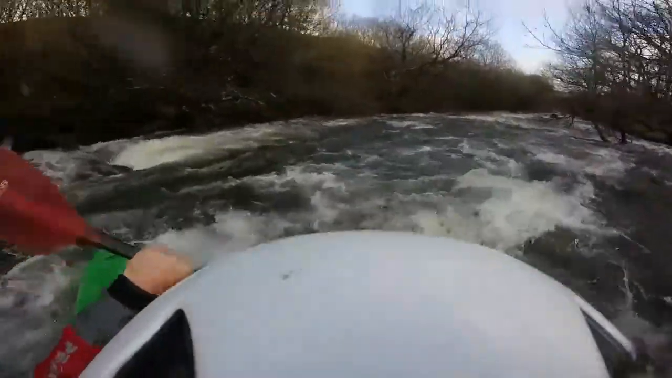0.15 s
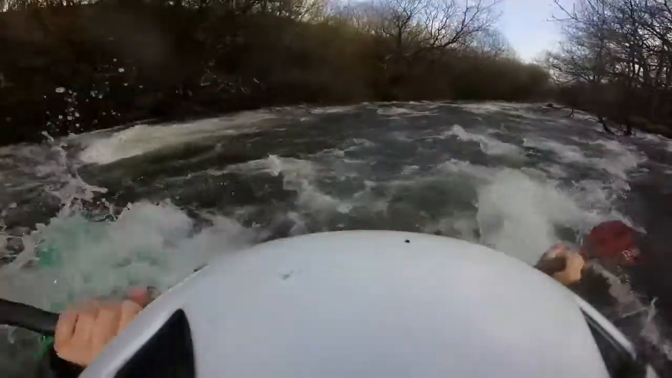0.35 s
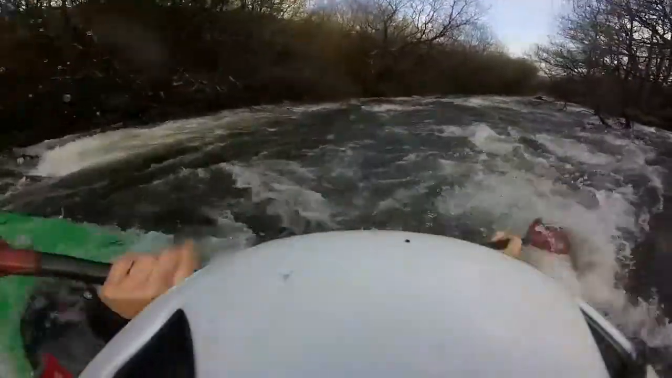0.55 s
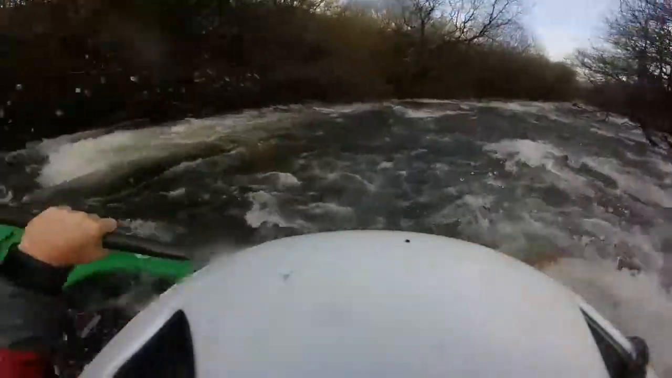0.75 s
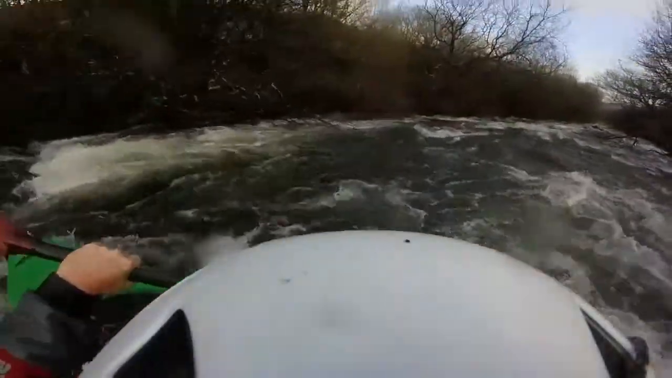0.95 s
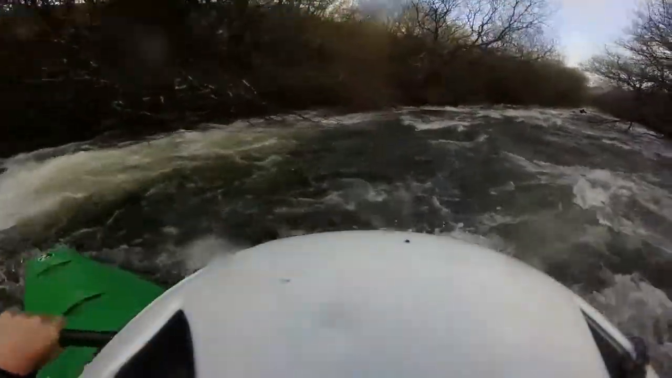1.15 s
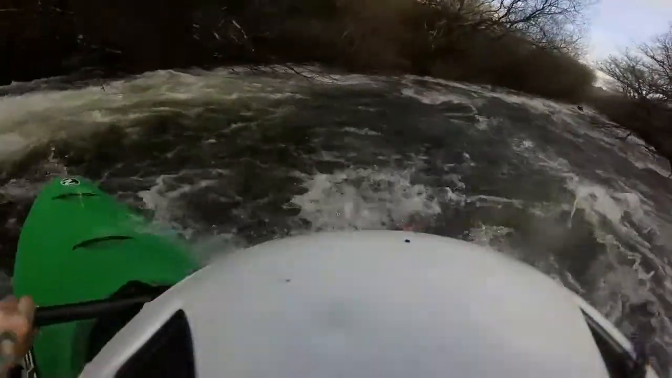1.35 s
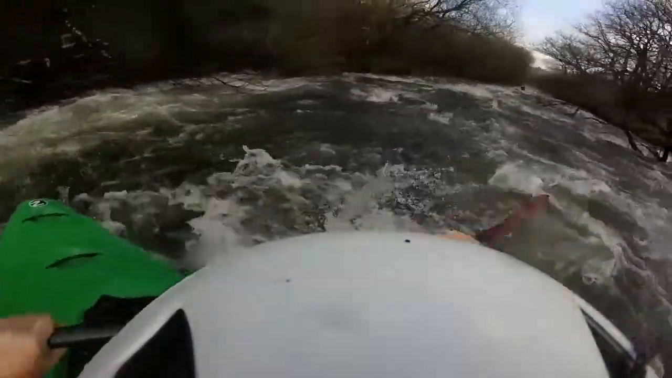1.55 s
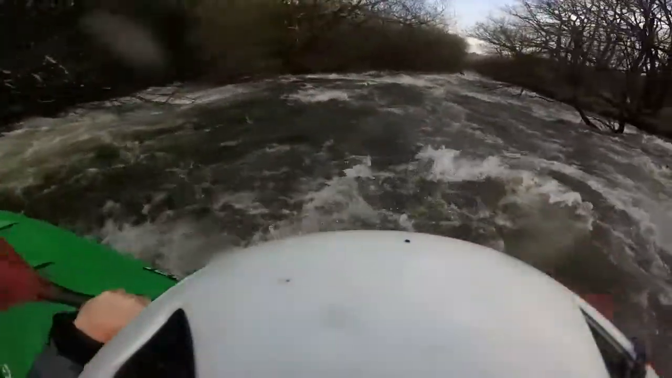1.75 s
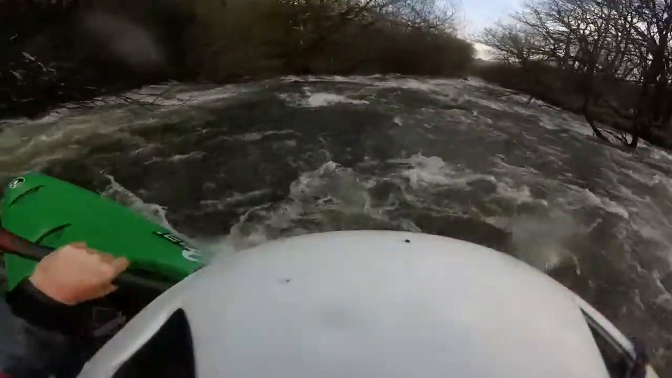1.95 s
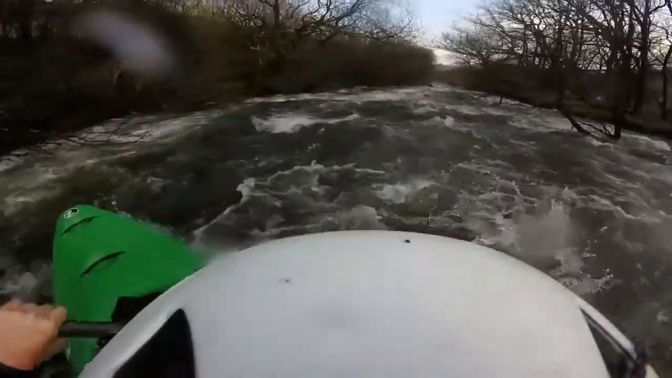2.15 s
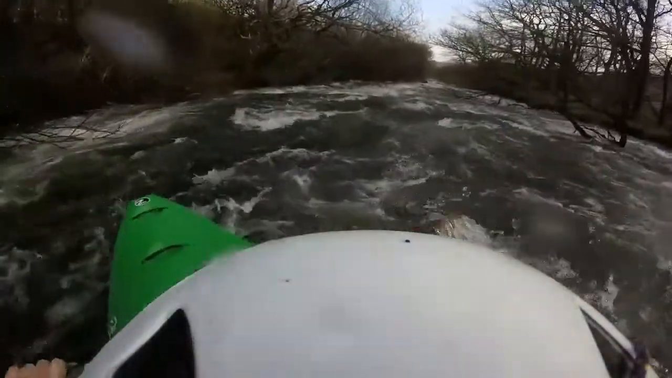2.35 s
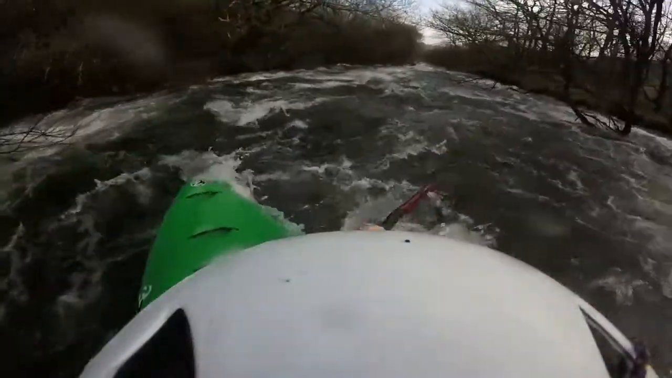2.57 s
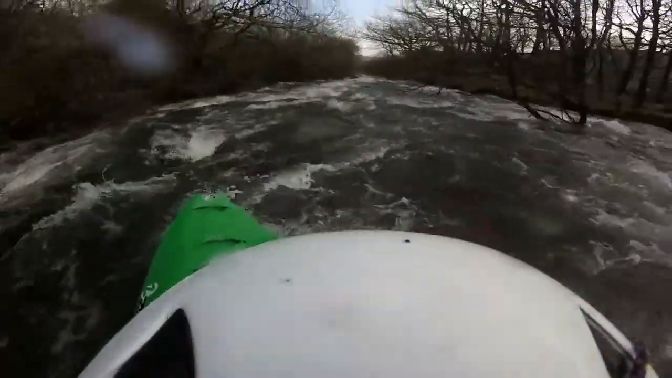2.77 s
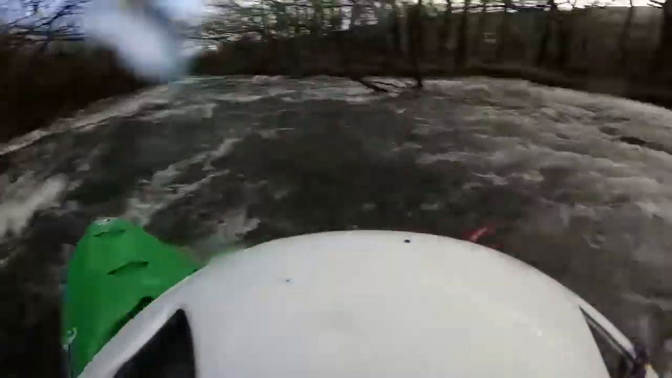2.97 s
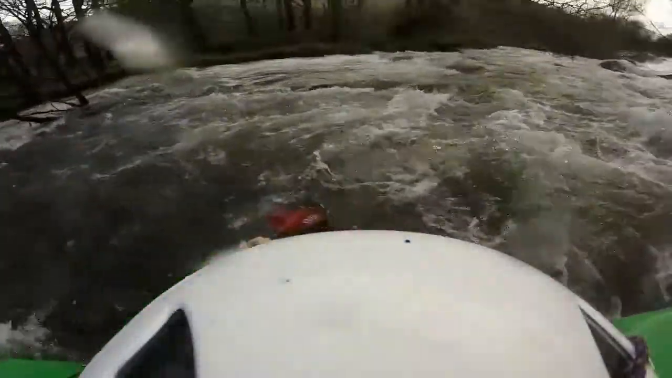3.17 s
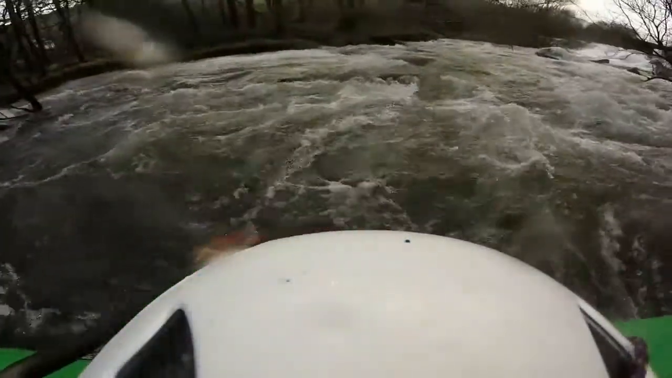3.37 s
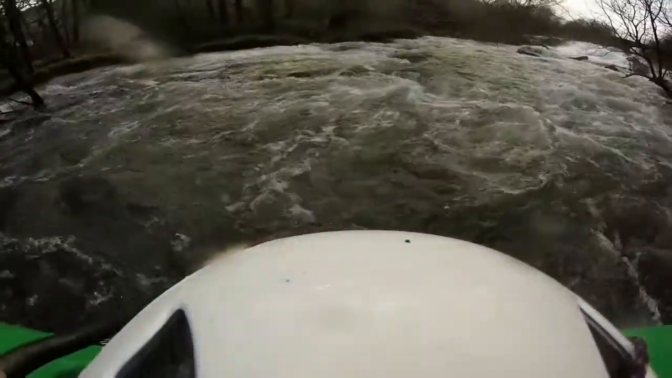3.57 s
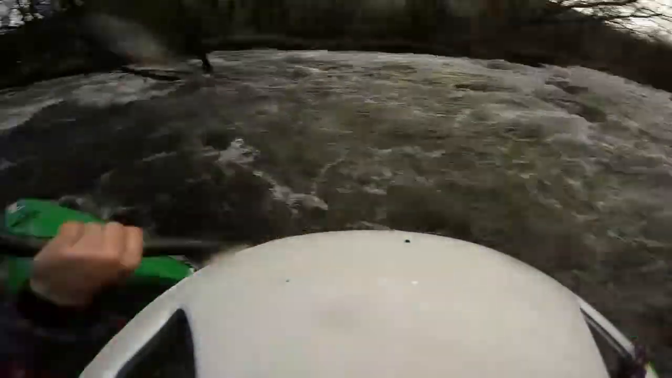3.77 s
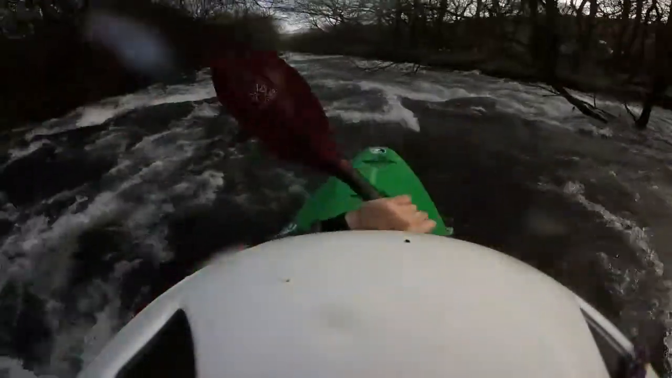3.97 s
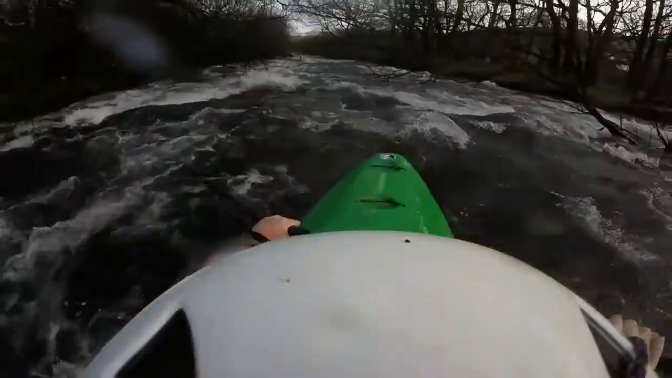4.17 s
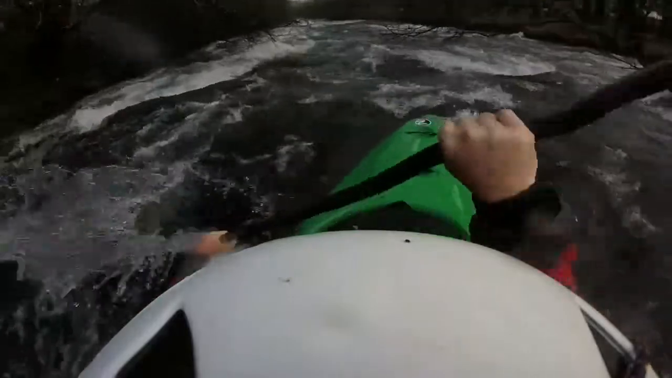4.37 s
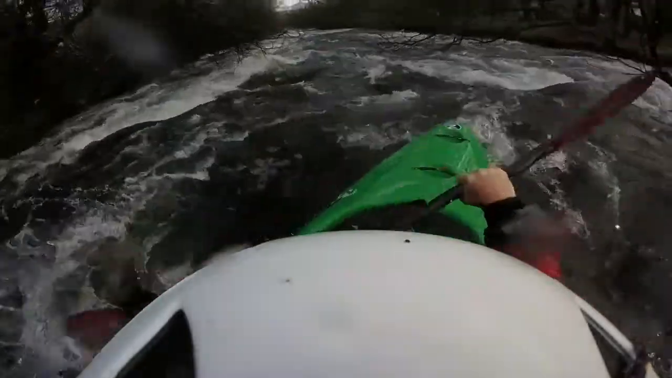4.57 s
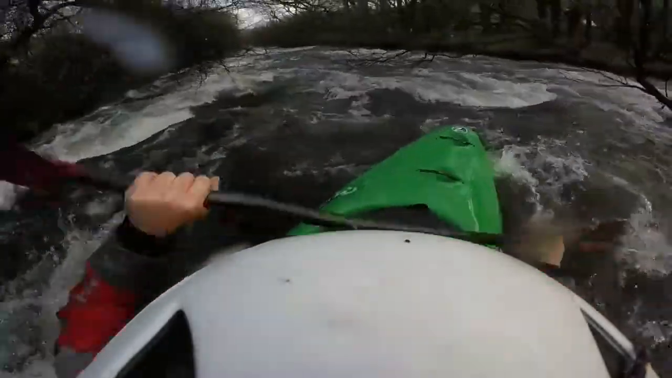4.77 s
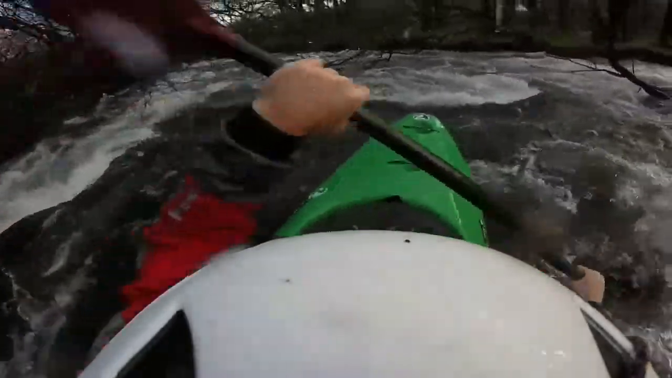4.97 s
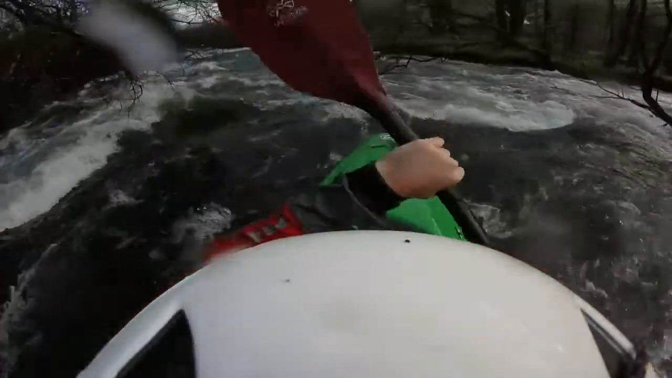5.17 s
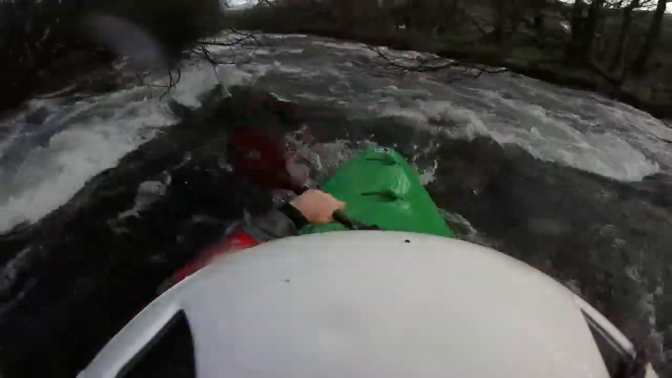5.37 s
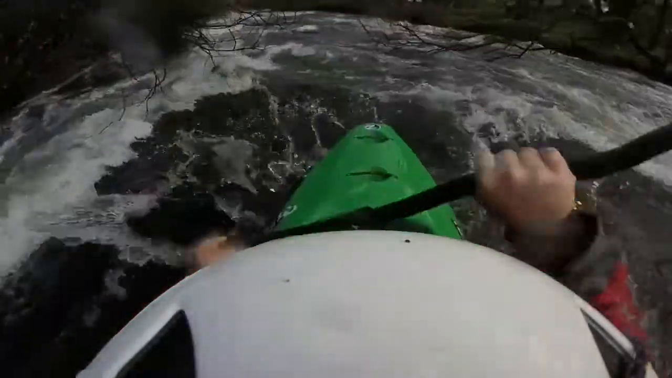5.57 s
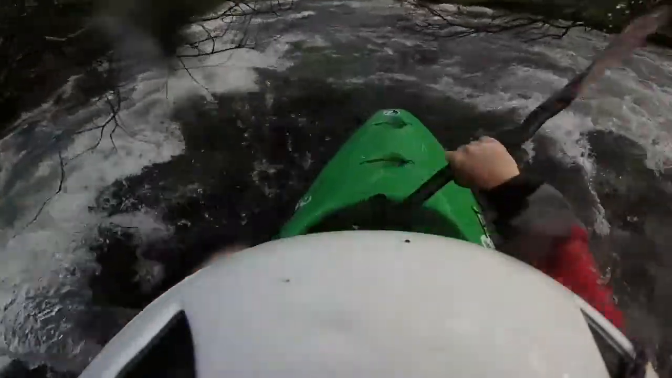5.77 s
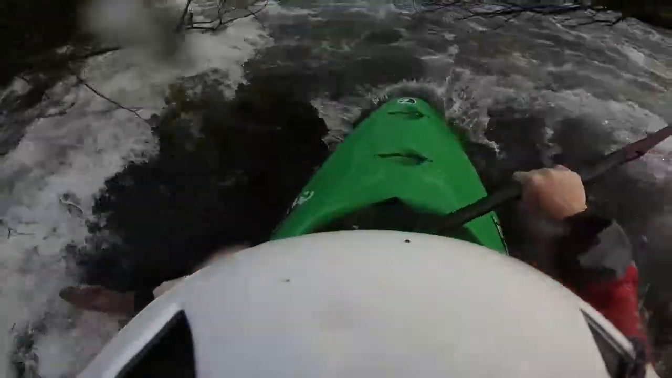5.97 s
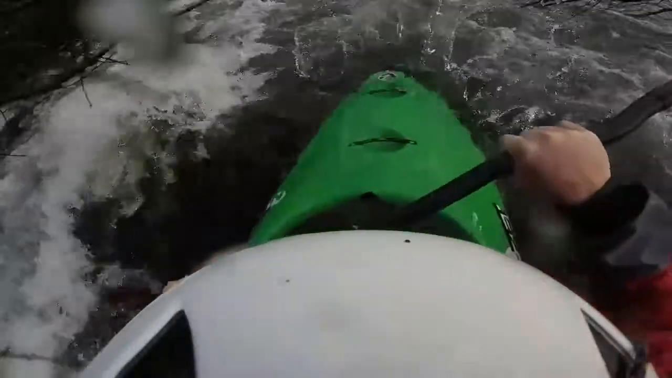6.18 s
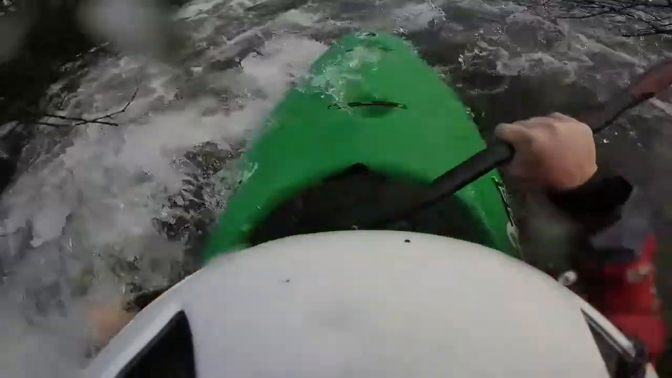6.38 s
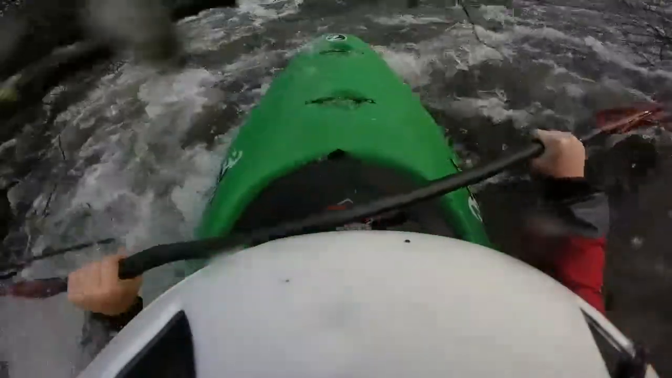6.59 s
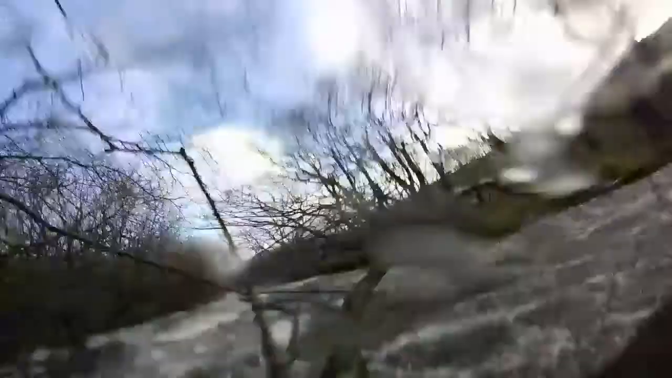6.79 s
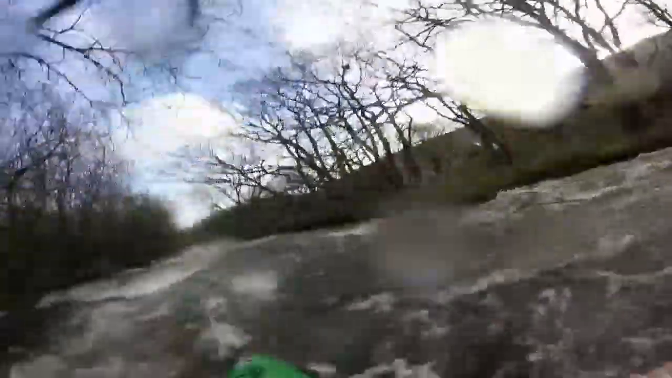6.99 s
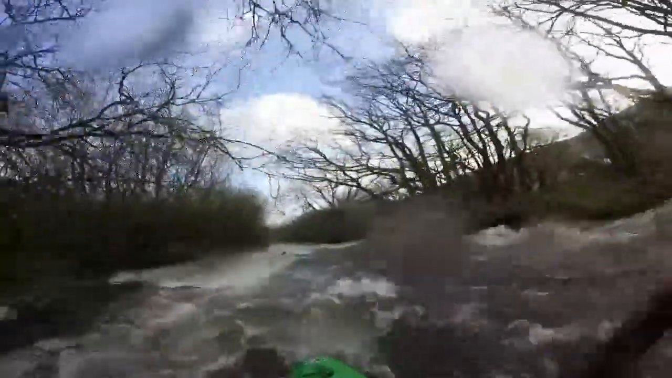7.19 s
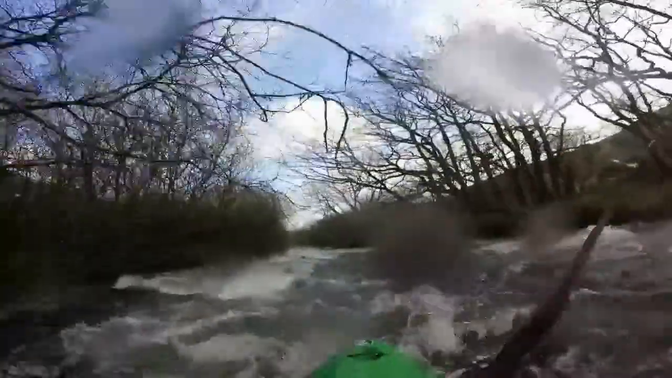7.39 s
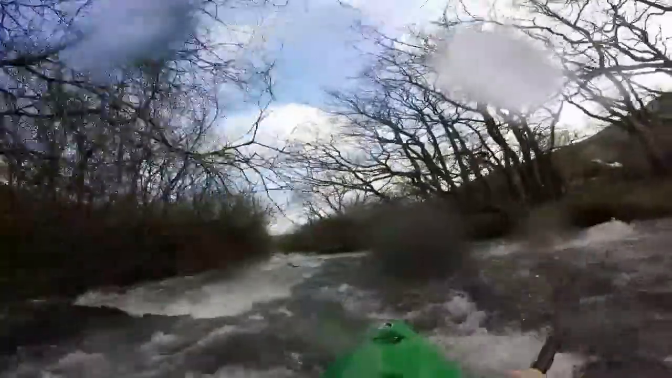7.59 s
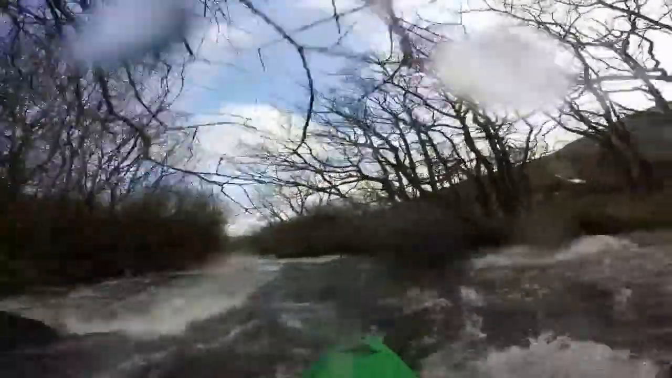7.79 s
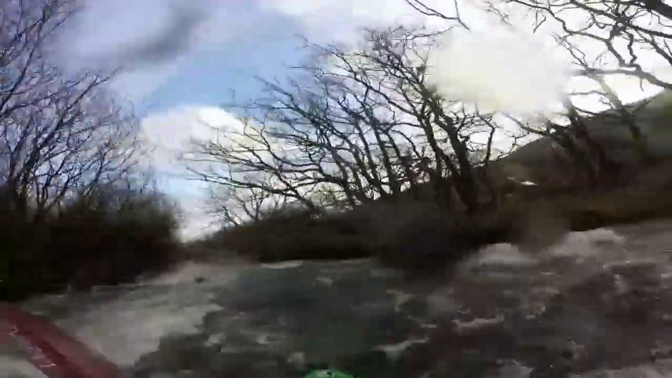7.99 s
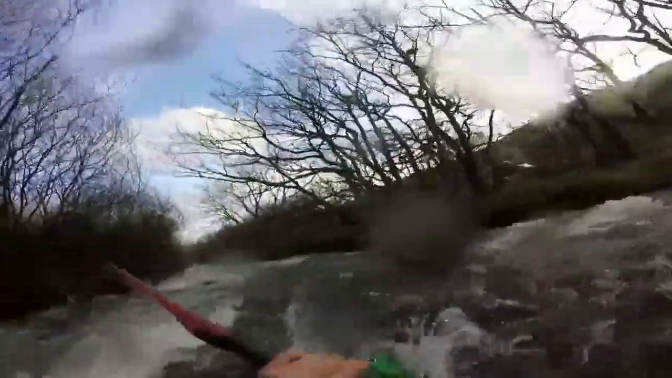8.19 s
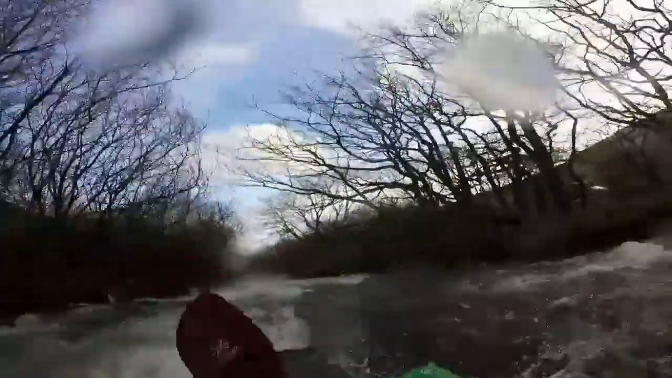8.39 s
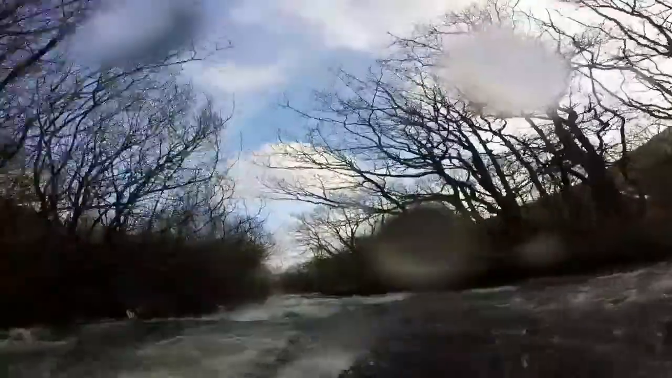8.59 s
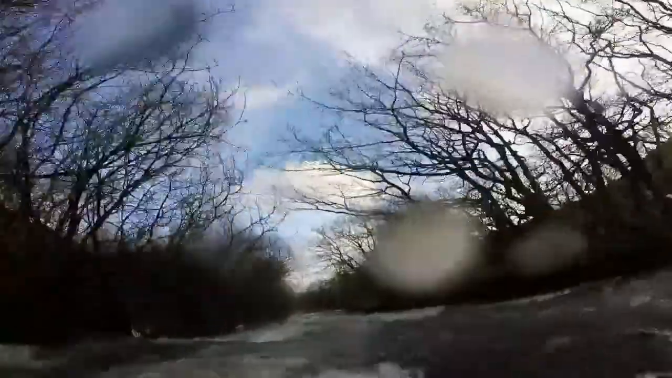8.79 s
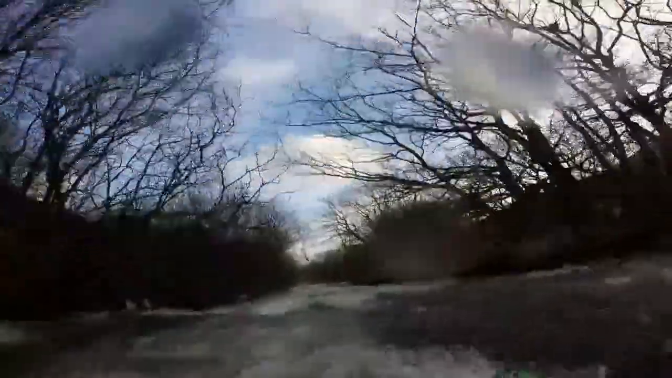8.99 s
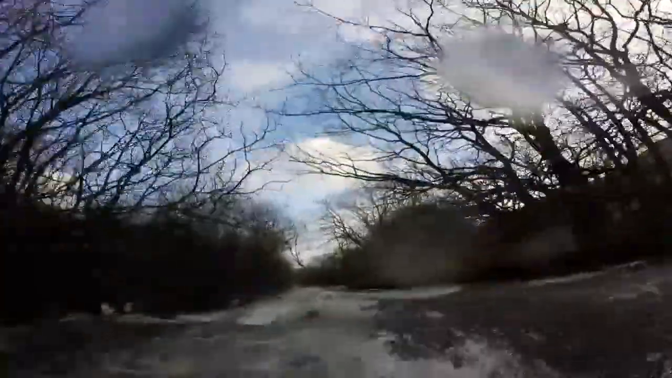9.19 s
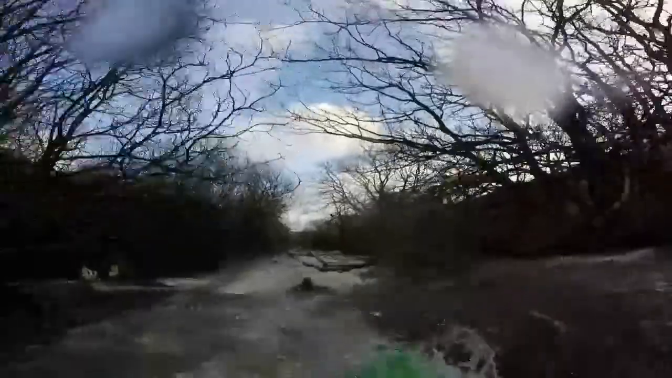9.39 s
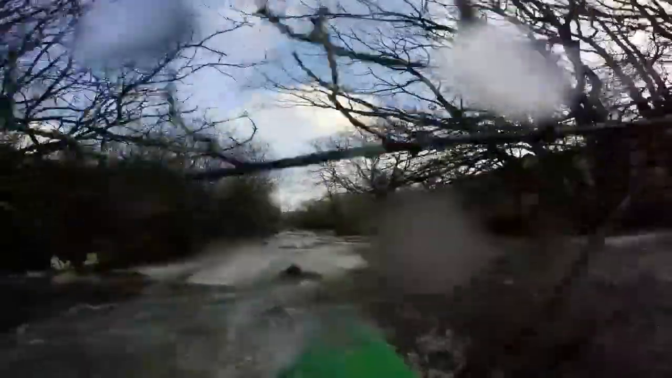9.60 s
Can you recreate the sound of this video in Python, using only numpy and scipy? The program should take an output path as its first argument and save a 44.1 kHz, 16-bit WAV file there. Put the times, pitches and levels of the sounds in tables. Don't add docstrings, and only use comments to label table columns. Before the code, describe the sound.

Close, boxy whitewater heard from inside a sealed helmet-camera case. At 0 s the water is turned down, and its patchy hiss and hull wash grow over the first second. Deep heaving and soft bass bumps run beneath; short gliding groans from the mount come near 0.5, 1.0-1.3 and 1.8-2.1 s. Stronger thuds cluster at 2.9-3.1 and 3.8-4.5 s, with small drop taps between 3.9 and 5.8 s. A knock at 6.27 s precedes harsh, clipped twig cracks and scratching at 6.32-6.39 s. A hollow branch blow shakes and scrapes at 6.7-6.9 s, then bright twig snaps hit at 7.1-7.2 s. Each burst sinks the water, which slowly recovers, now with a faint whistling hiss. Lighter taps follow at 7.5 and 7.85-8 s, thuds and a brighter spray burst around 8.3-8.5 s, and last ticks near 9.5 s.

```python
import sys
import numpy as np
from scipy import signal
from scipy.io import wavfile
from scipy.ndimage import uniform_filter1d

SR = 44100
rng = np.random.default_rng(int(sys.argv[2]) if len(sys.argv) > 2 else 0)


def natural_amplitude(level_db):
    exponent = np.asarray(level_db, float) / 20
    return 10 ** exponent


def generate_wav(sig):
    pcm = np.round(np.clip(np.atleast_2d(sig).T, -1, 1) * 32767).astype(np.int16)
    wavfile.write(sys.argv[1], SR, pcm)


N = 425565

# (start [s], end [s], slow part of the dip [dB])
OVERLOADS = [
    (-.3, -0.096, 20),
    (6.318, 6.388, 21.5),
    (6.692, 6.899, 22.5),
    (7.094, 7.13, 22),
    (7.15, 7.189, 24),
]


def rms_one(x):
    return x / np.sqrt(np.mean(x ** 2) + 1e-20)


def in_time(rows):
    times, *columns = np.transpose(rows)
    return [np.interp(np.arange(N) / SR, times, column) for column in columns]


def drift(rate):
    r = np.exp(-80 * np.pi * rate / SR)
    noise = rng.standard_normal(N // 40 + 2002)
    slow = signal.lfilter([1], [1, -2 * r, r * r], noise)[2000:]
    return np.interp(np.arange(N) / 40, np.arange(len(slow)), rms_one(slow))


def band(x, low_hz, high_hz, order=2):
    return signal.sosfilt(signal.butter(order, [low_hz, high_hz], "band", fs=SR, output="sos"), x)


def evened(x, span_s):
    return x / np.sqrt(uniform_filter1d(x ** 2, round(span_s * SR)) + 1e-6)


def resonance(x, hz, width_hz):
    r = np.exp(-np.pi * width_hz / SR)
    feedback = [1, -2 * r * np.cos(2 * np.pi * hz / SR), r * r]
    return signal.lfilter(np.array([1, 0, -1]) * (1 - r * r) / 2, feedback, x)


def patchy_noise(spectrum, patchy_db, bright_db=0):
    hz, level_db = np.transpose(spectrum)
    edges = np.geomspace(hz[0], hz[-1], num=round(2 * np.log2(hz[-1] / hz[0])) + 1)
    out, together, white = 0, drift(4.8), rng.standard_normal((2, N))
    for k, (low, high) in enumerate(zip(edges, edges[1:])):
        centre = np.sqrt(low * high)
        gain_db = np.interp(np.log(centre), np.log(hz), level_db)
        if centre > 4500:
            gain_db = gain_db + bright_db * (1 if centre < 8000 else .5)
        flicker_db = patchy_db * (.35 * together + 0.7 * drift(4))
        out = out + natural_amplitude(gain_db + flicker_db) * band(white[k % 2], low, high)
    return out


def grains(per_s, spread_db):
    sizes = natural_amplitude(spread_db * np.minimum(rng.exponential(1, N), 5)) * rng.choice([-1, 1], N)
    return rms_one(sizes * (rng.random(N) < per_s / SR))


def case(x):
    # (pitch [Hz], width [Hz], level [dB])
    wall_rings = [(1500, 420, 2), (2225, 1040, -1), (2670, 326, 4.5), (3860, 750, -8), (6175, 780, -12),
                  (8270, 3130, -22.5)]
    rings = 0
    for k, (hz, width_hz, level_db) in enumerate(wall_rings):
        rings = rings + (-1) ** k * natural_amplitude(level_db) * resonance(x, hz, width_hz)
    return rings - 0.19 * resonance(rings, 4540, 1900)


def river(gain_db):
    # (pitch [Hz], level [dB per Hz])
    rush_colour = [(600, -13), (1000, -0.5), (1500, 1), (2200, 0.5), (3200, -7.5), (5000, -3.5),
                   (7500, 1.5), (10000, -11), (13000, -2), (15500, -22)]
    # (pitch [Hz], level [dB per Hz])
    wash_colour = [(160, -40), (270, 1), (367, 1), (512, -4), (870, -6), (1100, -8), (1430, -31),
                   (2420, -120)]
    # (time [s], level [dB])
    flow = [(0, -38), (.48, -34.5), (.9, -37), (1.6, -39), (3.67, -40), (4.0, -37.5), (4.44, -39.5),
            (5.0, -36), (5.67, -36.5), (6.25, -34.5), (6.68, -33.5), (7.09, -36.5), (7.63, -34.5),
            (7.9, -35.5), (8.5, -36.5), (8.9, -35.5), (9.16, -39.5), (9.65, -34.5)]
    t = np.arange(N) / SR
    flow_db, = in_time(flow)
    spray_db = 6 * np.exp(-((t - 8.45) / 0.11) ** 2)
    foam = case(patchy_noise(rush_colour, 1.6, bright_db=.3 * spray_db))
    splashes = case(band(grains(300 * natural_amplitude(4 * drift(5)), 4.0), 900, 9000))

    askew_s, askew_hz, width_hz, askew_db = 6.9, 5830, 760, -17.5
    whistle = resonance(resonance(rng.standard_normal(N), askew_hz, width_hz), askew_hz, 2 * width_hz)
    whistle = natural_amplitude(askew_db + spray_db) * rms_one(whistle) * (t > askew_s)

    rush = rms_one(foam) + natural_amplitude(-12.5) * rms_one(splashes) + whistle
    wash = natural_amplitude(-8) * rms_one(patchy_noise(wash_colour, 2.0))
    return natural_amplitude(flow_db + gain_db) * (rush + wash)


def swell(gain_db):
    # (time [s], rocking level [dB], heave level [dB])
    motion = [(0, -54, -53), (.3, -45.5, -41), (.7, -49, -31), (1.05, -46, -29), (1.6, -51, -33.5),
              (2.6, -54.5, -43.5), (3.1, -46.5, -35), (3.55, -58, -40.5), (4.0, -44, -31),
              (4.7, -49, -35.5), (6.3, -48.5, -32.5), (6.68, -51.5, -35), (6.95, -37, -35),
              (7.3, -54.5, -49), (7.8, -57, -39), (8.45, -41, -31), (9.1, -53, -35), (9.65, -47, -28)]
    rocking_db, heave_db = in_time(motion)
    slosh_db = -55 + 0.4 * (rocking_db - rocking_db.mean())
    slop_s, slop_length_s, slop_db = .18, 0.35, 8
    from_middle_s = abs(np.arange(N) / SR - slop_s - slop_length_s / 2)
    slosh_db += slop_db * (from_middle_s < slop_length_s / 2)
    heave = evened(band(rng.standard_normal(N), 6, 22), .4) * natural_amplitude(-.5)
    buffet = evened(band(rng.standard_normal(N), 61, 130, order=3), 0.46)
    slosh = evened(band(rng.standard_normal(N), 140, 280, order=3), 0.29)
    bass = natural_amplitude(heave_db) * heave + natural_amplitude(rocking_db) * buffet + natural_amplitude(slosh_db) * slosh
    return natural_amplitude(.4 * gain_db) * bass


def thuds():
    # (time [s], peak level [dB], pitch [Hz], overtone level [dB])
    blows = [(0.178, -27.5, 103, -17.5), (0.967, -26, 83, -26), (2.172, -36, 105, -9),
             (2.912, -15, 88.5, -43), (3.02, -16.5, 74, -18), (3.073, -16.5, 105.5, -17),
             (3.277, -31, 87.5, -18), (3.813, -19.5, 61, -17), (3.88, -14.5, 90.3, -21),
             (3.957, -12.5, 89.6, -16.5), (4.177, -23.5, 135, -25), (4.408, -26, 98, -25),
             (4.457, -9.5, 98, -35), (4.54, -16.5, 100, -25), (5.046, -26.5, 86, -34),
             (5.238, -26.5, 97, -19), (5.615, -24.5, 61, -18), (5.867, -28, 99, -11),
             (7.034, -26, 123, -14), (7.47, -38, 97, -2), (7.871, -32, 106, -7), (7.97, -19, 101, -16.5),
             (8.273, -22.5, 84.4, -13), (8.366, -14.5, 101.4, -10.5), (8.455, -14.5, 100, -16.5),
             (8.628, -23.5, 83, -6), (8.826, -32, 90, -23), (9.202, -35, 88, -16), (9.362, -29.5, 124, -16)]
    ring_cycles = 6
    out, t = np.zeros(N + SR), np.arange(SR // 4) / SR
    for s, peak_db, hz, over_db in blows:
        x = np.maximum(t - .002, 0) * np.log(1000) * hz / ring_cycles
        body = x * np.exp(1 - x) * np.sin(2 * np.pi * hz * t)
        overtone = natural_amplitude(over_db) * 2.46 * x * np.exp(1 - 2.2 * x) * np.sin(2 * np.pi * 3.15 * hz * t)
        out[round(s * SR):][:len(t)] += natural_amplitude(peak_db - 4.0) * (body + overtone)
    return out[:N]


def groans():
    # (time [s], length [s], first pitch [Hz], last pitch [Hz], peak level [dB])
    slips = [
        (.47, .13, 256, 150, -40.5),
        (0.991, 0.148, 170, 245, -29.5),
        (1.127, 0.15, 244.5, 290, -38.5),
        (1.804, 0.16, 90.8, 233, -32.5),
        (1.958, .09, 215, 170, -37.5),
        (2.049, 0.084, 203.4, 275, -43),
    ]
    glide_share, peak_s, rise_db, sag_db_per_s = 0.91, 0.057, 7, 88
    out, wobble, flutter = 0, drift(43), drift(58)
    for s, length, from_hz, to_hz, peak_db in slips:
        t = np.arange(N) / SR - s
        hz = np.interp(t, [0, glide_share * length], [from_hz, to_hz])
        below_peak_db = np.maximum(rise_db * (1 - t / peak_s), sag_db_per_s * (t - peak_s))
        fade = np.clip(np.minimum(t, length - t) / 0.026, 0, 1)
        tone = np.sin(2 * np.pi * np.cumsum(hz * (1 + 0.057 * wobble)) / SR)
        out = out + fade * natural_amplitude(peak_db - below_peak_db - 0.5 + 3.3 * flutter) * tone
    return out


def drags():
    # (time [s], scratch level [dB], shake level [dB], build time [s], release time [s])
    catches = [(6.321, -15, -19.5, .004, 0.097), (6.34, -27, -36, 0.015, 0.03),
               (6.379, -11, -41, 0.03, 0.0053), (6.696, -24.5, -10, 0.0032, 0.037),
               (6.74, -40, -26.5, 0.065, 0.23), (6.795, -24.5, -15, 0.076, 0.056),
               (6.82, -19, -9, 0.022, 0.014), (6.855, -41.5, -24.5, 0.064, 0.09),
               (6.899, -21, -20, 0.028, 0.0047), (7.097, -9.5, -15, .003, 0.03),
               (7.111, -16.5, -39.5, 0.014, 0.022), (7.153, -10.5, -38, 0.0018, 0.014),
               (7.181, -11.5, -22, 0.023, 0.026), (7.5, -46, -49, .03, .15), (7.87, -40, -49, .04, .15),
               (7.93, -39.5, -39, 0.082, .15), (9.52, -31, -48, .05, 0.077)]
    t, scratch, shove = np.arange(N) / SR, 0, 0
    for s, scratch_db, shake_db, build, release in catches:
        clear = min([end for _, end, _ in OVERLOADS if end > s - .005] + [N / SR])
        strain = natural_amplitude(-30 * np.maximum((s - t) / build, (t - s) / release))
        scratch = scratch + natural_amplitude(scratch_db) * strain * np.clip(1 - (t - clear) / 0.0034, 0, 1)
        shove = shove + natural_amplitude(shake_db) * strain * np.clip(1 - (t - clear) / 0.028, 0, 1)
    clicks = grains(7000, 3.0) * natural_amplitude(2.5 * drift(120))
    duller = signal.lfilter([1], [1, -.87], case(clicks))
    deep_shake = evened(band(rng.standard_normal(N), 31, 170, order=3), 0.02)
    rattle = natural_amplitude(-18) * rms_one(band(rng.standard_normal(N), 170, 730))
    return scratch * rms_one(duller) + shove * (deep_shake + rattle)


def taps(table, hollow_db):
    out, t = np.zeros(N + SR), np.arange(SR // 25) / SR
    noises = rng.standard_normal((len(table), len(t)))
    for (s, peak_db, hz, bright_db, ms), noise in zip(table, noises):
        press = np.clip(t / 0.00016, 0, 1) * np.exp(-(1000 * t / ms) ** 3)
        chatter = press * (np.sin(2 * np.pi * hz * t) + .9 * noise)
        through_case = case(press * noise)
        ring = resonance(resonance(chatter, hz, 1200), hz, 2200)
        clack = band(through_case, 730, 4400)
        crack = band(through_case, 4500, 9700)
        knock = band(press * noise, 220, 870)
        blow = 0
        for part, level_db in [(ring, 0), (clack, -5), (crack, bright_db), (knock, hollow_db)]:
            blow = blow + natural_amplitude(level_db) * part / abs(part).max()
        out[round(s * SR):][:len(t)] += natural_amplitude(peak_db) * blow
    return out[:N]


def contacts():
    # (time [s], peak level [dB], ring pitch [Hz], crack over peak [dB], contact time [ms])
    drops = [(.886, -24, 3880, 0, 2.5), (.886, -19, 2510, -15, 1), (2.06, -29, 2480, -4.5, 3.3),
             (3.928, -26.5, 2780, -15, 7), (3.962, -26, 420, -30, 8.4), (4.118, -31, 334, -27, 25),
             (4.862, -22.5, 2090, -14, 4), (5.18, -26, 2700, -16, 4.6), (5.803, -23.5, 1800, -10.5, 3.1),
             (6.267, -10, 1256, -13, 1.54), (9.466, -24.5, 1580, -16, 3.1), (9.519, -22, 4300, -7, 2.9),
             (9.517, -21.5, 2240, -2, 3), (9.5406, -20, 1840, -15, 3.8)]
    first_twig = [(6.3189, 6, 2017, -19, 3.2), (6.3321, -2.5, 1500, -5, 1.4), (6.334, -2.5, 1500, -33, 3.5),
                  (6.3515, -12, 1630, -25, 5.3), (6.364, -7.5, 1840, -15.5, 1.3),
                  (6.369, -17, 1800, -16, 2.5), (6.377, -1.5, 2450, -15, 2), (6.3873, -22, 1620, -2, 1.3)]
    branch = [(6.694, -3.5, 1460, -31, 3.5), (6.6991, 6, 1420, -25, 2.3), (6.7101, -10.5, 1550, -23, 2.2),
              (6.8185, -6.5, 2570, 0.5, 1.76), (6.8285, -12, 2700, -4, 1.4), (6.893, -28.5, 1500, 3, 4.1),
              (6.9594, -31.5, 2460, -7, 3.6), (6.977, -37.5, 1530, -1.5, 2.9)]
    last_twig = [(7.0949, 6, 2623, -12, 2), (7.103, 6.5, 1680, -22.5, 1), (7.108, -13, 1535, -3.5, 3.1),
                 (7.1214, -5, 1550, -24, 2.5), (7.152, -5, 2150, -4.5, 1.8), (7.1565, -14, 1980, -11, 2.1),
                 (7.167, -5, 2700, 1, 1.5), (7.175, -8.5, 1820, 4, 3), (7.1795, -3, 2470, -2.5, .99),
                 (7.182, -5, 1550, -5.5, 2.7), (7.188, -22.5, 1700, -5.5, 2.7)]
    twig_tips = [(7.4746, -14.5, 2620, -12, 1.4), (7.49, -25.5, 1500, -21, 1.3),
                 (7.528, -36.5, 1710, 5, 1.6), (7.849, -30.5, 2210, -6, 4.7), (7.866, -29, 2665, -5, 9.4),
                 (7.878, -20.5, 1820, -27, 1.8), (7.894, -26, 1670, -24, 2.5), (7.9113, -25, 2540, -8, 4),
                 (7.918, -30, 1600, -15, 3), (7.938, -19.5, 1610, -18, 5.9), (7.9766, -23, 1650, -26, 2.8),
                 (7.9868, -25.5, 2600, -8, .85)]
    hollow_levels = [-21.5, -14, 0, -12.5, -23]
    return sum(map(taps, [drops, first_twig, branch, last_twig, twig_tips], hollow_levels))


def gain_control():
    sink_s, fast_depth_db, snap_db_per_s, creep_db_per_s = .03, 28, 381, 19
    t, gain_db = np.arange(N) / SR, np.zeros(N)
    for start, end, slow_db in OVERLOADS:
        since = np.maximum(t - end, 0)
        slow_dip = np.maximum(slow_db - creep_db_per_s * since, 0)
        fast_dip = np.maximum(fast_depth_db - snap_db_per_s * since, 0)
        gain_db = np.minimum(gain_db, -(slow_dip + fast_dip) * np.clip((t - start) / sink_s, 0, 1))
    return gain_db


def scene():
    t, first_blow_s, gain_db = np.arange(N) / SR, OVERLOADS[1][0], gain_control()
    look_ahead_s, duck_db = .009, -14
    dip = np.clip((t - first_blow_s + look_ahead_s) / 0.0017, 0, 1) * (t < first_blow_s + .02)
    water = natural_amplitude(duck_db * dip) * (river(gain_db) + swell(gain_db))
    return (water + thuds() + groans() + drags() + contacts())[None]


def band_limit(x):
    return signal.sosfilt(signal.butter(12, 16040, fs=SR, output="sos"), x)


def record(dry):
    top_cut = signal.cheby2(10, 50, 15900, fs=SR, output="sos")
    finished = signal.sosfilt(top_cut, np.clip(dry, -1, 1))
    return band_limit(finished)


dry = scene()
out = record(dry)
generate_wav(out)
```